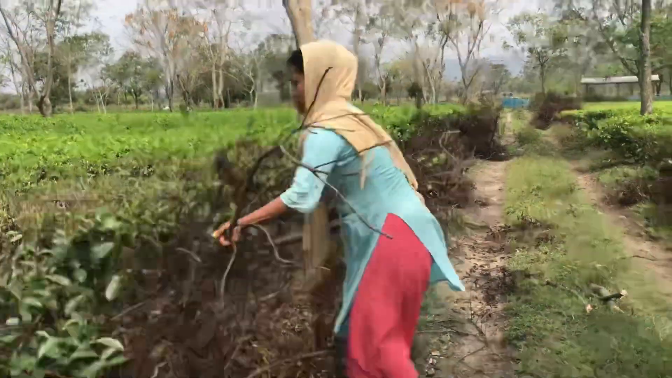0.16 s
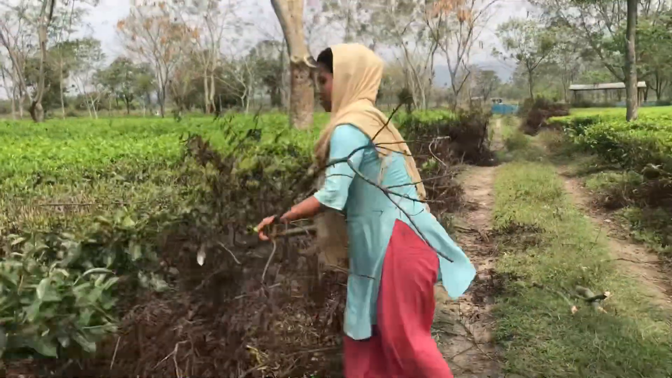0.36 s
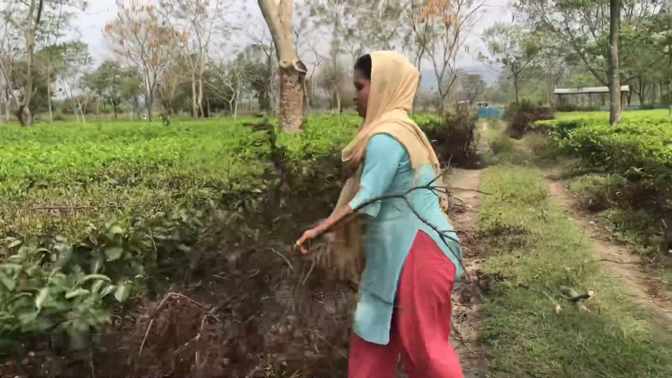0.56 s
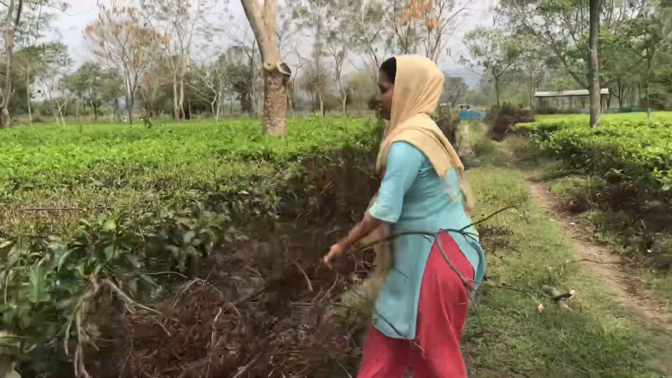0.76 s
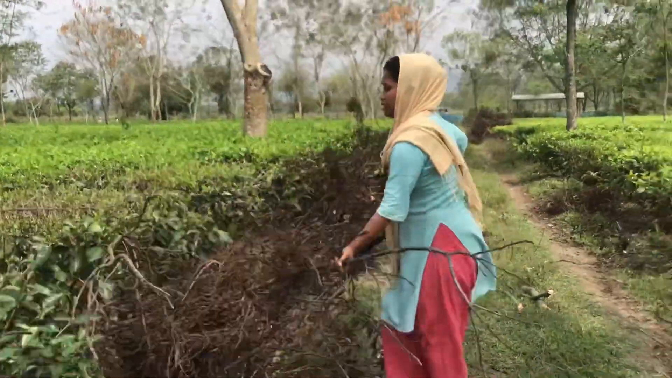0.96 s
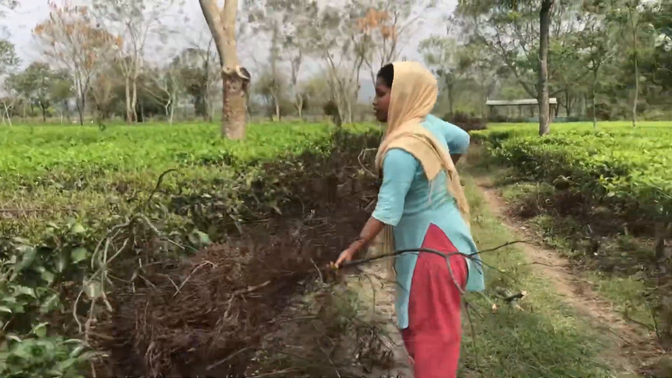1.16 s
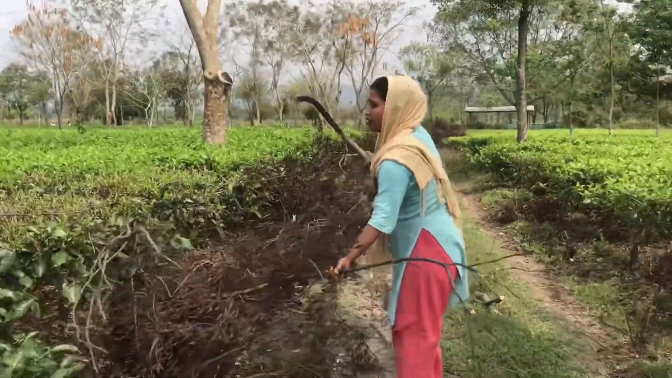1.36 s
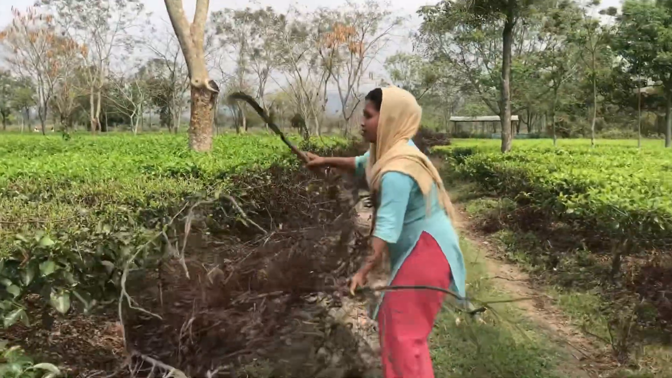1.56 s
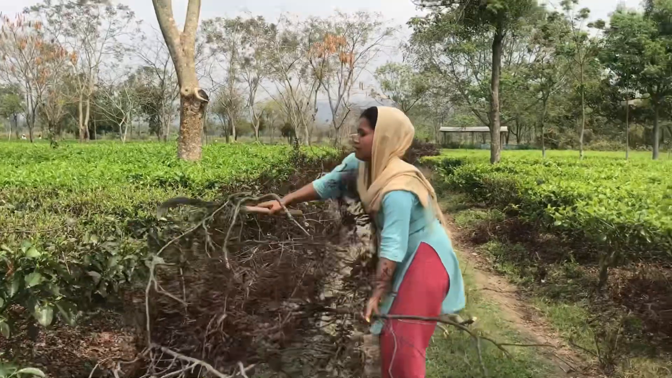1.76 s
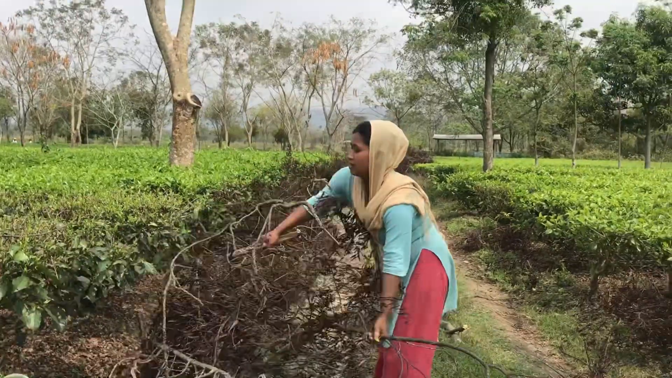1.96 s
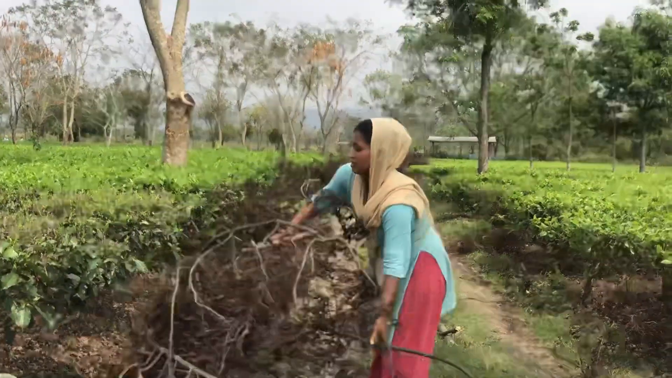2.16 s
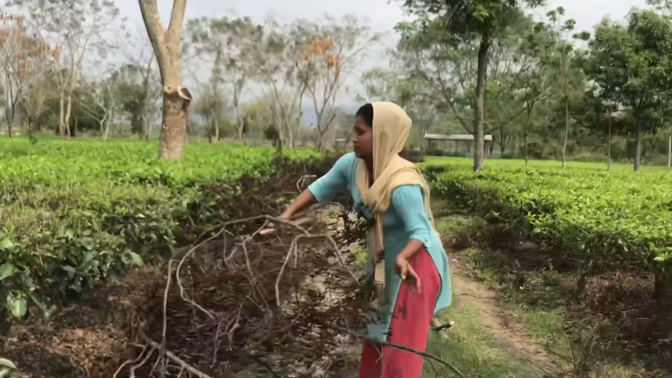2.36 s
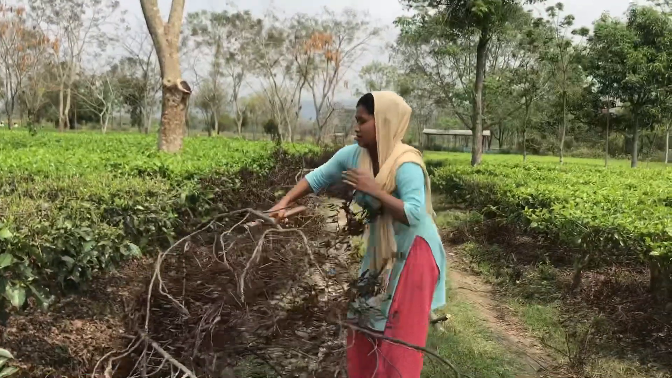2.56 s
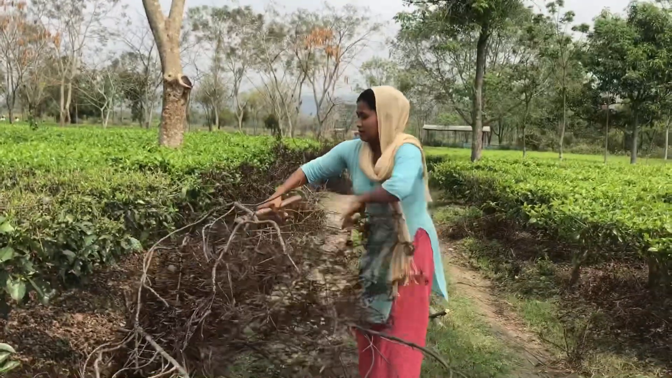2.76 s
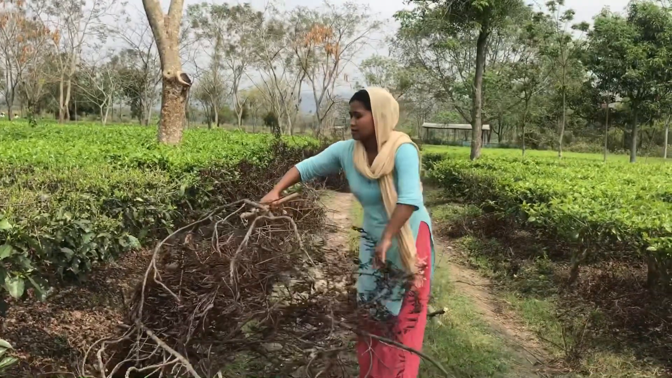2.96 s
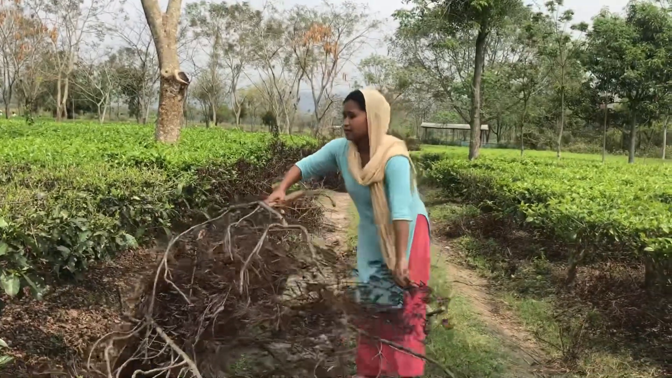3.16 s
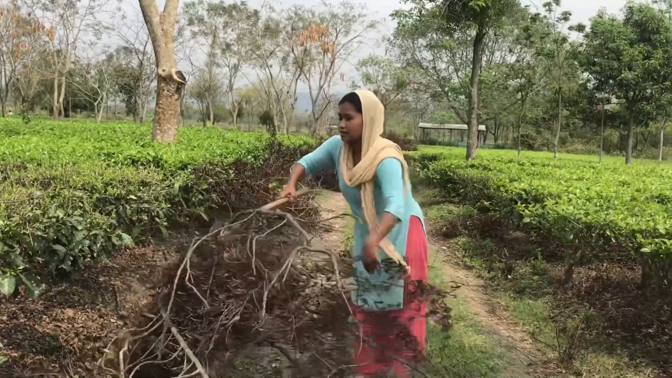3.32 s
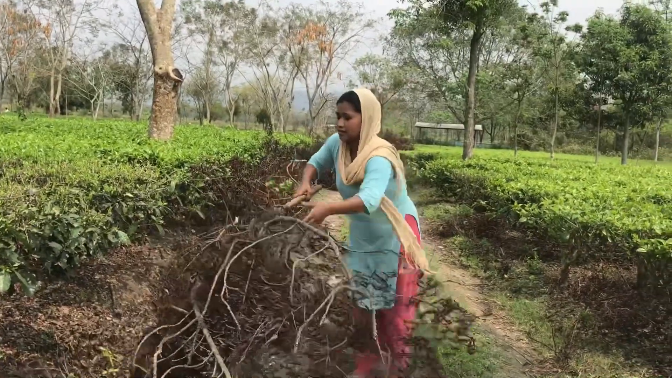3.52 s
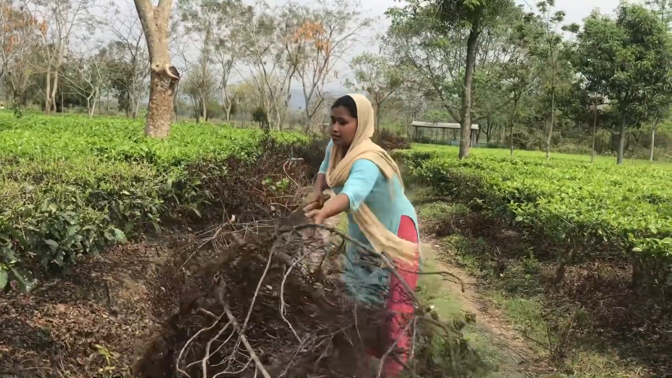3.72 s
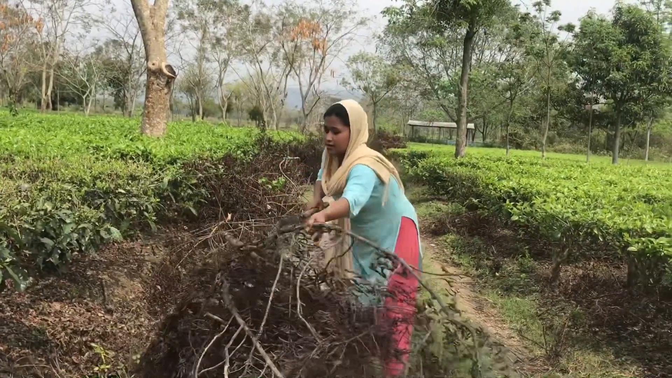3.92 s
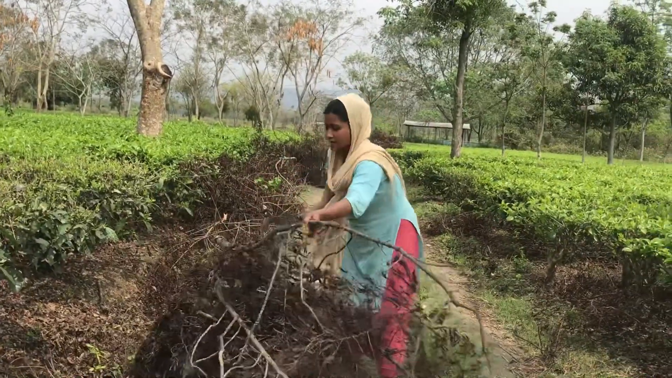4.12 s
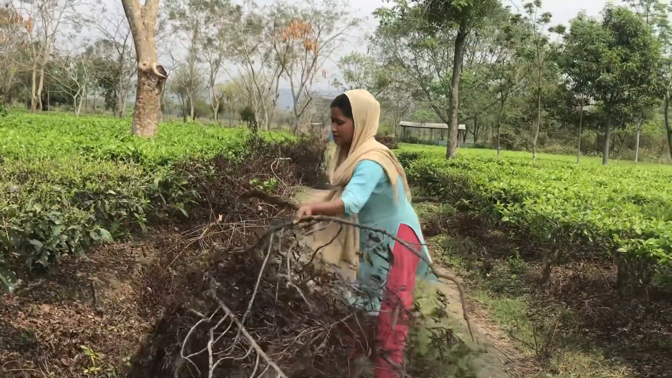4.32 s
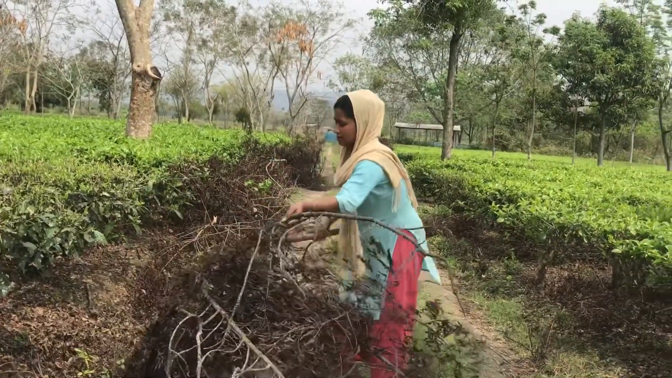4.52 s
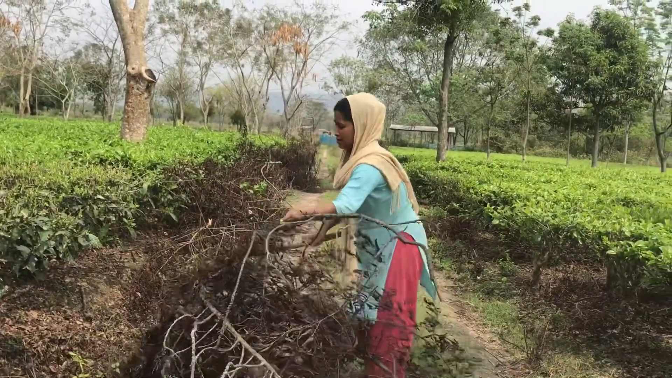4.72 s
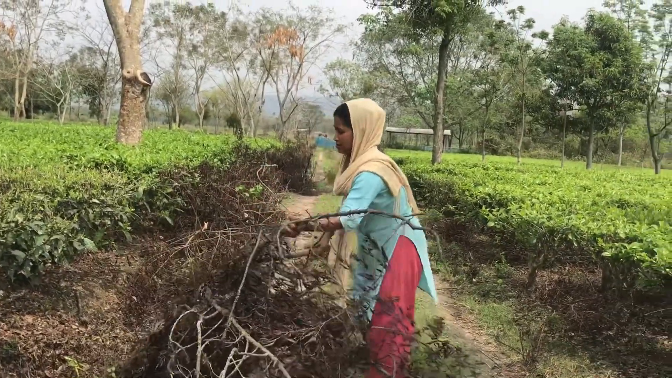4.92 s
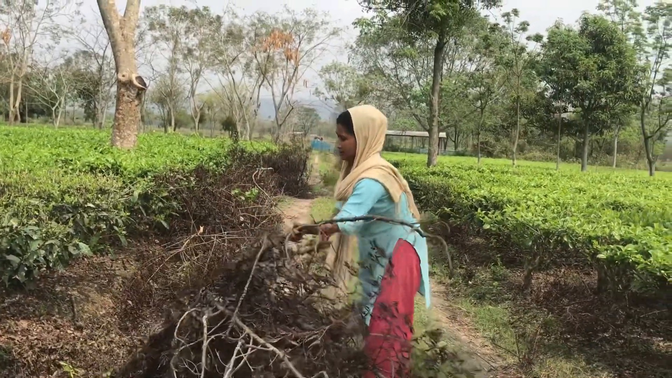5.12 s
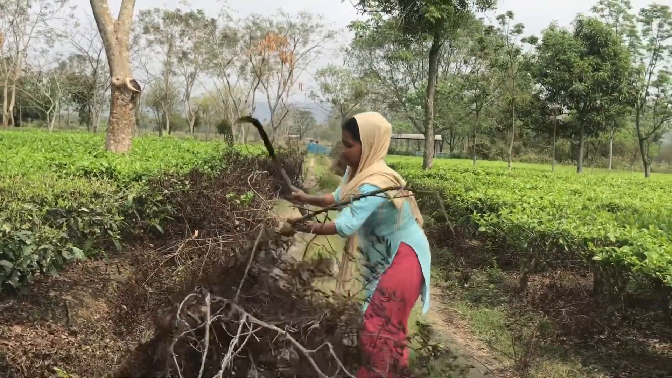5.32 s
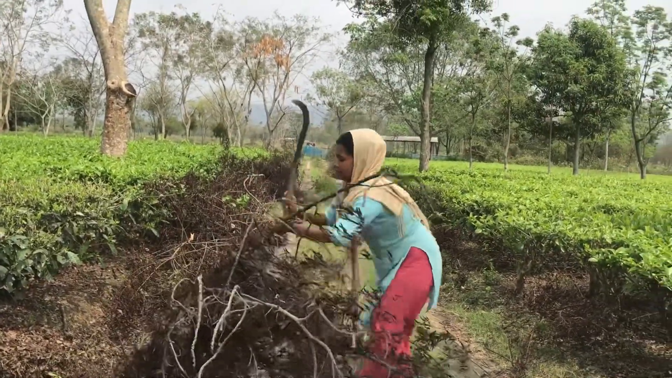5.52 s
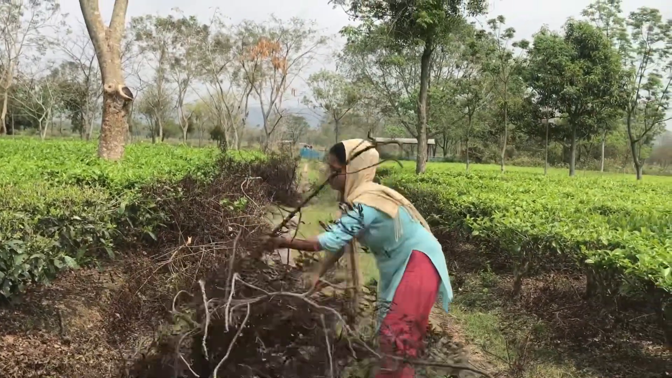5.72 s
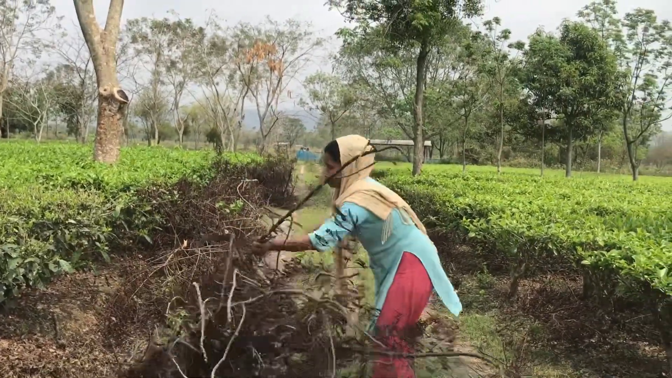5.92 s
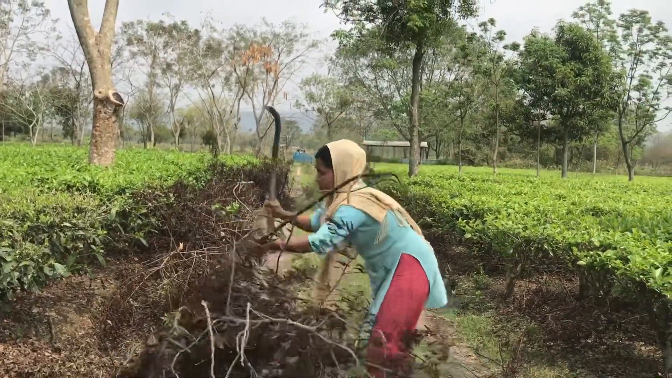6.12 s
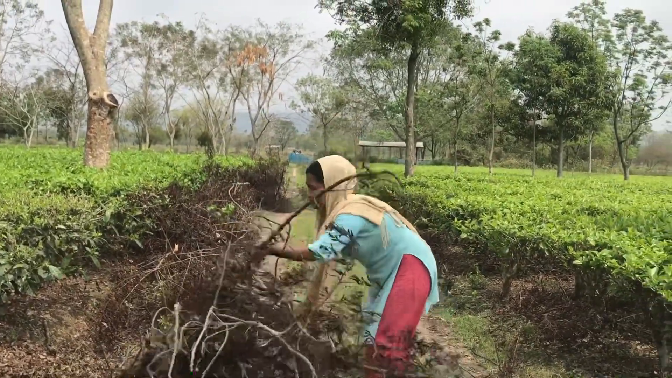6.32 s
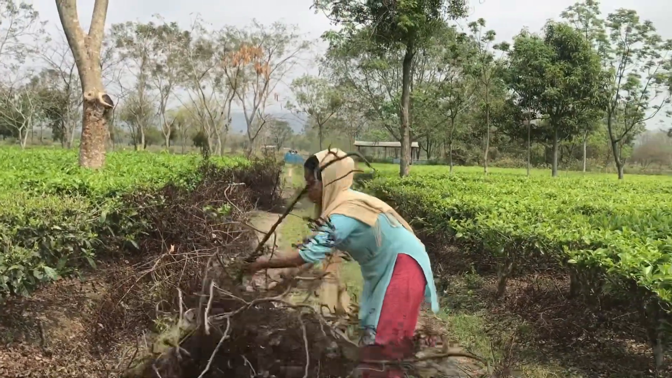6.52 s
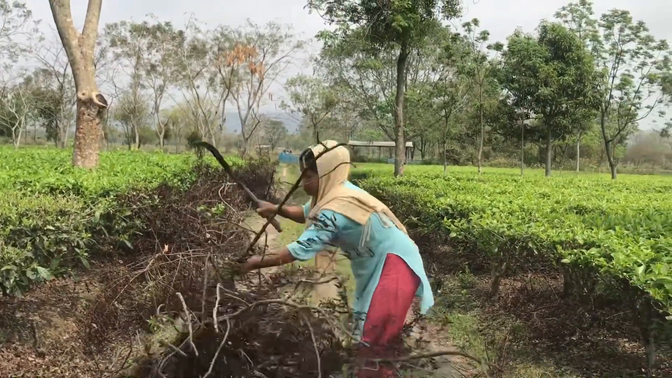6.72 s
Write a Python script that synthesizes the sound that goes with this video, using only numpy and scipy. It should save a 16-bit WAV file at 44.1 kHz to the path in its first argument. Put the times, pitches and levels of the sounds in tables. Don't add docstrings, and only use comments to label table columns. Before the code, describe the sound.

Crisp leafy rustling and brittle twig snaps fade to quieter shuffling, before two loud hacking blows crack into thick stems in a quiet field.

```python
import sys
import numpy as np
from scipy import signal
from scipy.fft import rfft, irfft, next_fast_len
from scipy.io import wavfile
from scipy.ndimage import uniform_filter1d, map_coordinates

SR = 44100
rng = np.random.default_rng(int(sys.argv[2]) if len(sys.argv) > 2 else 0)


def decibels_to_gain(level_db):
    exponent = np.asarray(level_db, float) / 20
    return 10 ** exponent


def put_to_file(sound):
    columns = np.atleast_2d(sound).T
    safe = np.clip(columns, -1, 1)
    whole_steps = np.round(safe * 32767)
    wavfile.write(sys.argv[1], SR, whole_steps.astype(np.int16))


N = 303275

# [t/s, effort level/dB, thick stems relative to effort/dB]
PULL = [(0, -51, -2), (.25, -54, -7), (.7, -48, -6.5), (1.0, -49.5, -4), (1.3, -56, -7.5), (1.9, -60, -4.5),
        (2.3, -59.5, -9.5), (2.9, -57, -11), (3.4, -58.5, -8), (3.9, -53.5, -17), (4.2, -63, -6),
        (4.5, -64.5, -8.5), (4.8, -57, -14), (5.1, -61.5, -8), (5.5, -63, -1.5), (6.0, -59, -15),
        (6.3, -59.5, -12.5), (6.88, -59, -13)]
# [t/s, level/dB, length/s, twigs relative to leaves/dB]
TUGS = [(0.044, -40, 0.087, -3.5), (0.363, -50.5, 0.14, 0.5), (0.538, -44.5, 0.079, -4),
        (0.661, -38, 0.083, -3), (0.778, -48.5, 0.036, -3), (0.848, -48.5, 0.04, -2),
        (1.123, -51.5, 0.05, -6.5), (1.492, -49, .04, -3), (1.732, -55.5, 0.07, -4.5),
        (2.052, -54.5, 0.05, -4.5), (2.32, -62, .04, -7), (2.436, -57, 0.052, -5),
        (2.76, -57.5, 0.046, -4.5), (3.057, -55, 0.097, -15), (3.17, -58, 0.061, 5.5),
        (3.423, -51, 0.045, -6.5), (3.51, -52, 0.066, -7), (3.68, -53, .09, -7.5),
        (4.016, -58.5, 0.073, -11), (4.304, -58.5, 0.064, -6), (4.64, -58, 0.059, 1.5),
        (5.023, -60, 0.086, -2.5), (5.213, -55.5, 0.042, -12), (5.304, -54, 0.076, -5.5),
        (5.39, -50.5, 0.072, -8), (5.54, -62, 0.064, 6), (5.824, -49, 0.094, -4.5), (6.005, -53, 0.16, -11),
        (6.556, -49.5, .1, -13), (6.633, -50, .06, -8.5)]
TUG_FALL_DB, TUG_RISE = 6.5, 1
TWIGS_DB, STEMS_DB = -7.5, -8
# [f/Hz, level per Hz/dB]
LEAVES = [(2500, -40), (5000, -7.5), (7000, -1), (10000, 2.5), (14000, 4.5), (16000, -1.5)]
TWIGS = [(900, -28.5), (2000, -7.5), (3200, -4.5), (5000, -3), (7000, -3.5), (11000, -25)]
WOOD = [(150, -20), (350, -8.5), (700, -2.5), (1400, -2.5), (2200, -7.5), (4000, -14.5)]

# [t/s, peak level/dB, twig pitch f/Hz]
SNAPS = [(.0523, -30, 8620), (0.0873, -25.5, 4060), (.1294, -32, 6770), (.4544, -34, 8840),
         (.634, -26.5, 3440), (.836, -33, 6910), (0.903, -25.5, 9400), (1, -34, 11300),
         (1.0735, -31.5, 11600), (1.132, -26.5, 6760), (1.1496, -33, 7450), (1.7325, -40.5, 2400),
         (1.243, -34, 8900), (2.3163, -37, 6860), (1.962, -38, 3900), (2.0736, -33, 7500),
         (2.418, -33, 11100), (3.8826, -38.5, 4480), (3.5944, -36, 3950), (3.683, -33, 11000),
         (3.952, -35.5, 11100), (4.009, -36, 4530), (4.195, -38.5, 11900), (5.0275, -37.5, 9360),
         (3.9804, -37, 11000), (5.3217, -37, 9050), (5.3787, -35, 8800), (6.1654, -40.5, 6680),
         (6.8159, -35.5, 6350), (6.8594, -38.5, 6060)]
CRACKLE_DB, CRACKLE_DB_PER_OCTAVE = -9, -1
TICK_DB, TICK_SPREAD_DB, TICK_HZ = 11, 2.5, 10500
# [t/s, peak level/dB, low band over
# high/dB, middle band over high/dB, t60/s]
CRACKS = [(.327, -21.5, 4, 4, 0.016), (.335, -24.5, 3, -4, 0.028), (.5482, -17, -16, -5, .006),
          (1.1792, -28.5, -10, -8, 0.021), (3.5085, -33.5, 11.5, 10, .01),
          (3.6257, -12.5, -11.5, -1, 0.016), (4.009, -37, -25, -15, .02), (4.354, -42.5, 14, 4, 0.01),
          (4.5692, -37, 0, 2, .025), (1.0187, -35, 12, 0, 0.016), (1.186, -34, 14, 4, .014),
          (5.154, -46, 14, 6, .012), (4.988, -23, -23, -2.5, 0.011), (4.9902, -28, -18, 4, 0.015),
          (5.637, -30.5, -4, -4, .012), (2.7237, -38, -3, -3, .012), (2.7861, -36, -20, -8, .012),
          (2.834, -39, -20, -4, .012), (3.4211, -34, -20, -8, .012), (5.697, -23, -3, 0, .05),
          (5.703, -10.5, -3.5, 16, 0.013), (6.385, -17, -7, 4, .012), (6.447, -3, -10.5, -1.5, .012),
          (6.4889, -10, -23, -6.5, .012)]

# [t/s, peak level/dB, bite time/s, shaken leaves level/dB, leaves t60/s]
BLOWS = [
    (5.7012, -8.5, 0.0014, -30.5, 0.34),
    (6.3828, -11, .0015, -30.5, 0.48),
    (4.5699, -27.5, 0.0021, -44.5, .32),
    (2.0033, -33.5, 0.00094, -44, 0.14),
    (4.5602, -37.5, 0.00039, -71, .05),
    (5.5815, -47, 0.0018, -71, .05),
    (5.7552, -40.5, .0056, -45, 0.091),
]
# [f/Hz, width/Hz, level/dB]
THICK_STEM = [(677, 180, -4), (1466, 160, -1.5), (2686, 98, 3), (3700, 120, -4.5), (4130, 59, -2),
              (4760, 150, -3.5), (5180, 95, -7.5), (6200, 170, -8), (6980, 83, -8), (8800, 84, -21),
              (208, 9.5, -2), (305, 100, -9.5), (575, 38, -0.5), (1060, 520, -6.5)]
FORKED_STEM = [(740, 98, 4), (2170, 150, 2), (2820, 180, -1.5), (3510, 250, -3), (4190, 170, -1.5),
               (5460, 320, -3), (6330, 450, -8.5), (9650, 240, -5.5), (11000, 110, -22), (143, 53, -10.5),
               (236, 50, -10), (960, 210, -2.5), (1350, 220, -0.5)]
# [f/Hz, width/Hz, level/dB]
STEMS = [
    THICK_STEM,
    FORKED_STEM,
    [(606, 150, -2.5), (1560, 170, -2.5), (2120, 150, -8.5), (2520, 150, -4.5), (3550, 270, -14.5), (393, 110, -4), (1240, 280, -6)],
    [(557, 97, 0), (1470, 260, -1), (3020, 100, -8), (3710, 100, -1), (4660, 210, -6)],
    [(2140, 900, 0)],
    [(354, 150, 1), (550, 220, 0)],
    [(590, 120, 2.5), (900, 300, -9), (1340, 200, -4)],
]
LEAD_S = 0.0026
# [f/Hz, level per Hz/dB]
SHAKE = [(200, 1), (600, -10), (2000, -6), (5000, -3), (9000, 0.5), (13000, 2.5), (16000, -5.5)]

# [f/Hz, width/Hz, level/dB]
LEAVING = [(260, 102, -0.5), (1330, 180, -8.5)]
LEAVING_DB, LEAVING_PEAK_S, LEAVING_FADE_DB_PER_S = -66, 0.84, 7.5
# [t/s, length/s, first pitch f/Hz, last pitch f/Hz]
WHISTLES = [
    (2.23, .19, 2870, 2710),
    (2.52, .2, 2950, 2730),
    (2.83, .15, 2670, 2510),
    (3.35, .06, 2600, 2950),
]
WHISTLE_DB, WHISTLE_EDGE_S = -75.5, .025
# [t/s, level/dB]
FAR = [(0, -54.5), (.46, -50.5), (1.5, -53), (1.9, -55), (2.65, -51.5), (3.1, -54.5), (3.9, -54.5),
       (4.4, -52.5), (5.0, -56.5), (6.0, -55), (6.5, -58), (6.75, -53.5)]
# [f/Hz, level per Hz/dB]
RUMBLE = [(14, -44), (36, -4.5), (76, 3), (100, -7), (140, -11), (260, -18), (400, -27.5), (650, -65)]
HISS = [(250, -39), (420, -0.5), (1000, -7), (4900, -24), (12000, -4.5), (16000, -3.5)]

# [f/Hz, width/Hz, depth/dB]
NOTCHES = [(4940, 230, -3), (7680, 650, -3), (10410, 530, -4), (13900, 1900, -4)]
HOUSING_DB = 2
EDGE_HZ, TOP_HZ = 15820, 16700


def drag():
    effort_db, weight_db = curves(PULL)
    power = decibels_to_gain(2 * np.array([effort_db, effort_db + TWIGS_DB, effort_db + weight_db]))
    for s, db, length, depth_db in TUGS:
        after = (np.arange(N) / SR - s) / length
        tug = decibels_to_gain(2 * (db - TUG_FALL_DB * np.maximum(after, -after / TUG_RISE)))
        power += tug * decibels_to_gain(2 * np.array([[0], [depth_db], [depth_db + STEMS_DB]]))
    return 10 * np.log10(power)


def brush(leaves_db, twigs_db, stems_db):
    jerk = wobble(30)
    leaves = rustle(LEAVES, grain=0.4, spread_db=3, patch_db=2.5, clump_db=1.6)
    twigs = rustle(TWIGS, grain=0.36, spread_db=2.0, patch_db=2.5, clump_db=1.6)
    stems = rustle(WOOD, grain=0.26, spread_db=5.0, patch_db=2.35, clump_db=1.44)
    edges_db = (leaves_db + twigs_db) / 2 - 0.5
    edges = crackle(edges_db, count=4000, pitch_hz=8030, cycles=1.95, spread_db=3.5)
    rubbing = decibels_to_gain(leaves_db + 1.04 * jerk) * leaves
    rubbing += decibels_to_gain(twigs_db + 0.86 * jerk) * twigs
    rubbing += decibels_to_gain(stems_db + 1.1 * jerk) * stems
    return rubbing + edges


def rustle(spectrum, grain, spread_db, patch_db, clump_db):
    touching = rng.random(N) < .06
    sizes = decibels_to_gain(spread_db * np.minimum(rng.exponential(size=N), 5)) * touching
    life = decibels_to_gain(-60 * np.arange(90) / SR / 0.0016)
    contacts = unit(np.convolve(sizes, life)[:N] * rng.standard_normal(N))
    grain = np.clip(grain, 0, 1)
    rub = np.sqrt(grain) * contacts + np.sqrt(1 - grain) * patchy(patch_db)
    return coloured(rub * decibels_to_gain(clump_db * wobble(45)), spectrum)


def patchy(depth_db):
    z = signal.stft(rng.standard_normal(N), nperseg=256)[2]
    field_db = uniform_filter1d(rng.standard_normal(z.shape), 8, 0)
    field_db = depth_db * unit(uniform_filter1d(field_db, 6, 1))
    return unit(signal.istft(z * decibels_to_gain(field_db), nperseg=256)[1][:N])


def crackle(level_db, count, pitch_hz, cycles, spread_db):
    draw = rng.random((count, 3))
    start = (draw[:, 0] * (N - 128)).astype(int)
    hz = np.clip(pitch_hz * np.exp(0.555 * rng.standard_normal(count)), 3200, 15000)[:, None]
    size = decibels_to_gain(level_db[start] - spread_db * np.log(.004 + draw[:, 1]))[:, None]
    t = np.arange(128) / SR
    envelope = np.exp(-t * hz / cycles) * (1 - np.exp(-t / .0001))
    grains = size * np.sin(2 * np.pi * hz * t) * envelope
    places = start[:, None] + np.arange(128)
    return np.bincount(places.ravel(), grains.ravel(), N)[:N]


def ticks(leaves_db, count):
    draw = rng.random((count, 3))
    start = (draw[:, 0] * (N - 1)).astype(int)
    db = leaves_db[start] + TICK_DB - TICK_SPREAD_DB * np.log(.1 + draw[:, 1])
    hz = TICK_HZ * 2 ** (.35 - 1.6 * draw[:, 2] ** 3)
    return list(zip(start / SR, db, hz))


def snaps(rows):
    track, t = np.zeros(N), np.arange(1024) / SR
    for s, db, hz in rows:
        crack_db = CRACKLE_DB + CRACKLE_DB_PER_OCTAVE * np.log2(hz / 3000)

        def twig(f):
            return resonance(f, hz, 0.36 * hz) ** 2 + decibels_to_gain(crack_db) * resonance(f, 6600, 14000)

        burst = rng.standard_normal(len(t)) * decibels_to_gain(-60 * t / 0.029) * (1 - np.exp(-t / 0.00053))
        tick = filtered(burst, twig)
        add(track, s, decibels_to_gain(db - 2.5) * tick / np.abs(tick).max())
    return track


def cracks():
    track, t = np.zeros(N), np.arange(4096) / SR
    for s, db, low_db, middle_db, t60 in CRACKS:
        def bands(f):
            low = decibels_to_gain(low_db) * resonance(f, 1400, 2100)
            middle = decibels_to_gain(middle_db) * resonance(f, 4040, 2900)
            return low - middle + resonance(f, 13500, 11000)

        tearing = decibels_to_gain(-60 * t / t60) + 3.5 * decibels_to_gain(-60 * t / 0.0025) + 0.086 * decibels_to_gain(-60 * t / 0.19)
        burst = evened(rng.standard_normal(len(t)) * tearing * (1 - np.exp(-t / 0.00031)))
        burst[9] += 1.84 * np.abs(burst).max()
        crack = filtered(burst, bands)
        add(track, s, decibels_to_gain(db) * crack / np.abs(crack).max())
    return track


def blows():
    track, shaking, t = np.zeros(N), np.zeros(N), np.arange(SR) / SR
    bite_t = t[:SR // 2]
    for (s, db, bite, shake_db, t60), stem in zip(BLOWS, STEMS):
        def wood(f):
            response = decibels_to_gain(-18.5) * resonance(f, 2700, 3800)
            for k, (hz, width, mode_db) in enumerate(sorted(stem)):
                response = response + (-1) ** k * decibels_to_gain(mode_db) * resonance(f, hz, width)
            return response

        push = (bite_t / bite) * np.exp(-bite_t / bite) + 0.1 * np.exp(-bite_t / 0.0093)
        force = evened(rng.standard_normal(SR // 2) * push)
        knock = filtered(force, wood)
        add(track, s - .0006, decibels_to_gain(db) * knock / np.abs(knock).max())
        add(shaking, s - LEAD_S, decibels_to_gain(shake_db - 60 * t / t60) * (1 - np.exp(-t / 0.0033)))
    leaves = rustle(SHAKE, grain=0.41, spread_db=-3.5, patch_db=0.0, clump_db=-2.5)
    return track + shaking * leaves


def vehicle():
    def bands(f):
        return sum(decibels_to_gain(db) * resonance(f, hz, width) ** 2 for hz, width, db in LEAVING)

    fade_db = LEAVING_FADE_DB_PER_S * np.abs(np.arange(N) / SR - LEAVING_PEAK_S)
    noise = unit(filtered(rng.standard_normal(N), bands))
    return decibels_to_gain(LEAVING_DB - fade_db + 2.1 * wobble(5.96)) * noise


def bird():
    song, t = np.zeros(N), np.arange(N) / SR
    for s, length, first_hz, last_hz in WHISTLES:
        hz = np.interp(t, [s, s + length], [first_hz, last_hz])
        shape = np.clip(np.minimum(t - s, s + length - t) / WHISTLE_EDGE_S, 0, 1)
        song += shape * np.sin(2 * np.pi * np.cumsum(hz) / SR)
    return np.sqrt(2) * song * decibels_to_gain(WHISTLE_DB + 1.6 * wobble(30))


def field():
    rumble = decibels_to_gain(curves(FAR)[0] + 1.2 * wobble(7)) * coloured(rng.standard_normal(N), RUMBLE)
    return rumble + decibels_to_gain(-65.0) * coloured(rng.standard_normal(N), HISS)


def resonance(f, hz, width):
    return 1j * f * width / (hz * hz - f * f + 1j * f * width)


def evened(burst):
    size = next_fast_len(len(burst) + 8192)
    spectrum = rfft(burst, size)
    coarse = np.sqrt(np.abs(uniform_filter1d(np.abs(spectrum) ** 2, size // 160)))
    return irfft(spectrum / (coarse + .1 * coarse.mean()), size)[:len(burst)]


def filtered(x, response):
    m = next_fast_len(len(x) + 8192)
    return irfft(rfft(x, m) * response(np.fft.rfftfreq(m, 1 / SR)), m)[:len(x)]


def coloured(x, spectrum):
    return unit(filtered(x, lambda hz: decibels_to_gain(along(spectrum, hz))))


def along(points, hz):
    f, v = np.transpose(points)
    return np.interp(np.log(hz + 1), np.log(f + 1), v)


def curves(rows):
    s, *columns = np.transpose(rows)
    return [np.interp(np.arange(N) / SR, s, column) for column in columns]


def wobble(rate):
    knots = rng.standard_normal(int(N * rate / SR) + 4)
    return map_coordinates(knots, [np.arange(N) * rate / SR])


def unit(x):
    return x / np.sqrt(np.mean(x ** 2) + 1e-20)


def add(track, s, sound):
    start = round(s * SR)
    track[start:start + len(sound)] += sound[:len(track) - start]


def scene():
    levels = drag()
    brushwood = brush(*levels) + snaps(SNAPS + ticks(levels[0], count=90)) + cracks() + blows()
    background = vehicle() + bird() + field()
    return (brushwood + background)[None]


def roll_off(x):
    return signal.sosfilt(signal.butter(12, 17080, fs=SR, output="sos"), x)


def record(dry):
    def housing(hz):
        notches_db = sum(db * np.exp(-((hz - centre) / width) ** 2) for centre, width, db in NOTCHES)
        return decibels_to_gain(HOUSING_DB + notches_db) * (hz < EDGE_HZ)

    heard = filtered(dry[0], housing)
    top = filtered(dry[0], lambda hz: (hz >= EDGE_HZ) * (hz < TOP_HZ))
    power = uniform_filter1d(np.diff(dry[0], prepend=0) ** 2, 128)
    sudden = power > 25 * np.roll(uniform_filter1d(power, 1024), 700)
    gate = np.clip(uniform_filter1d(4. * sudden, 400), 0, 1)
    mix = heard + decibels_to_gain(-19) * top * gate
    return roll_off(mix[None])


dry = scene()
out = record(dry)
put_to_file(out)
```